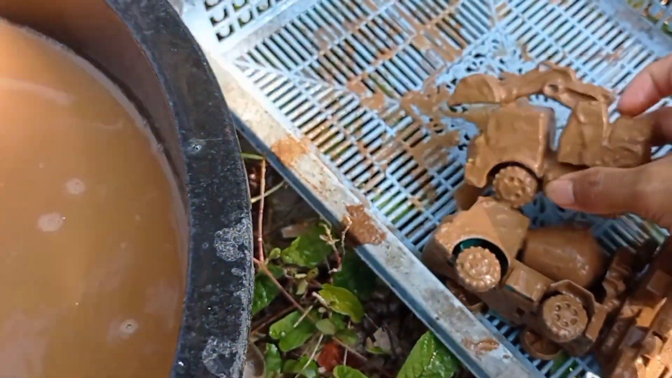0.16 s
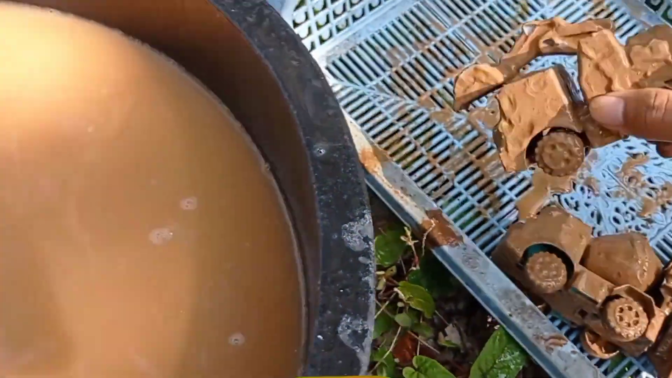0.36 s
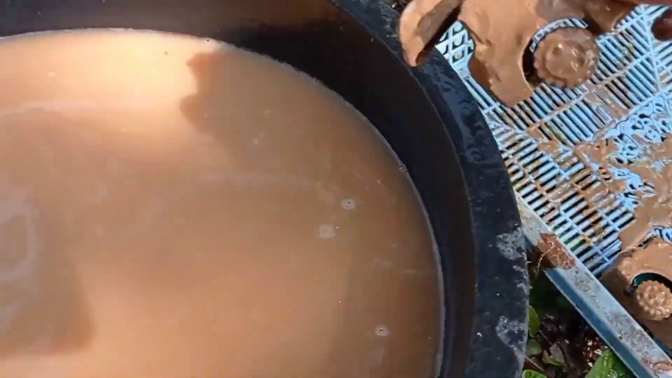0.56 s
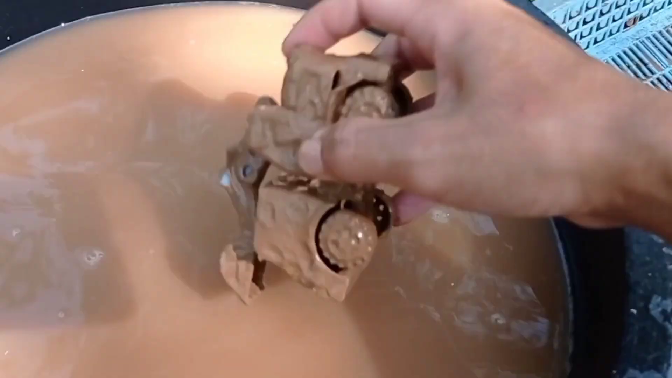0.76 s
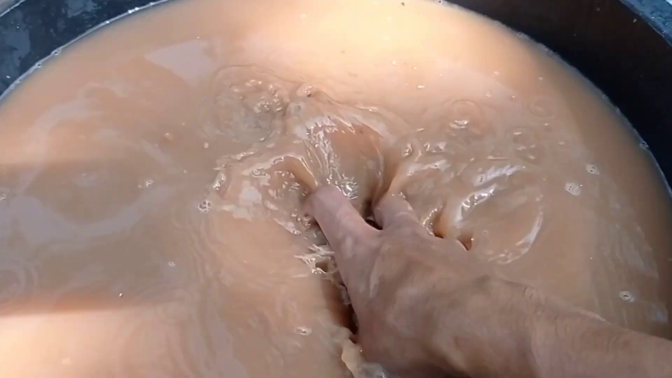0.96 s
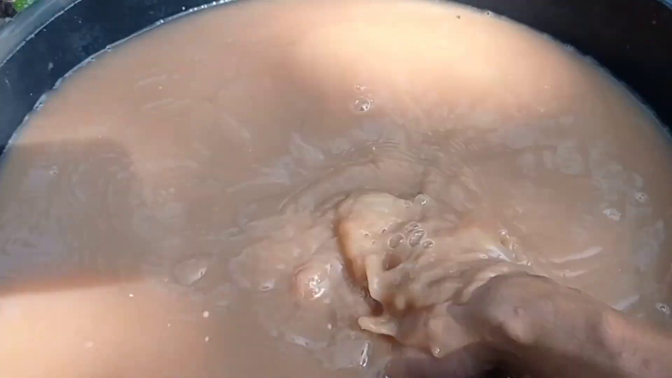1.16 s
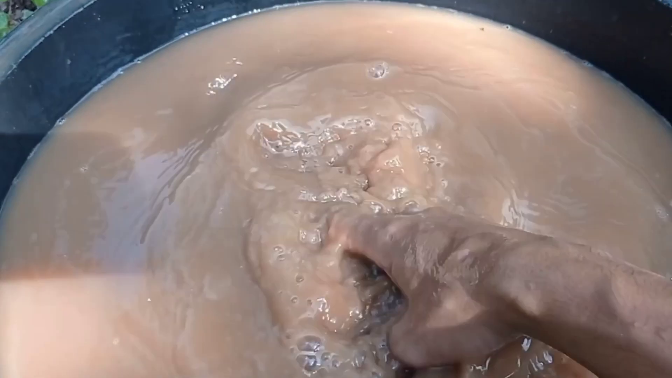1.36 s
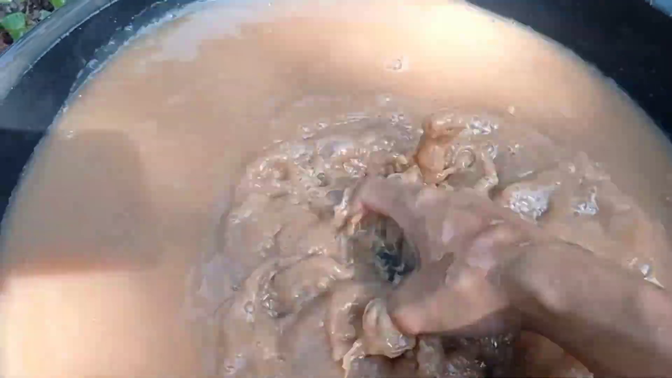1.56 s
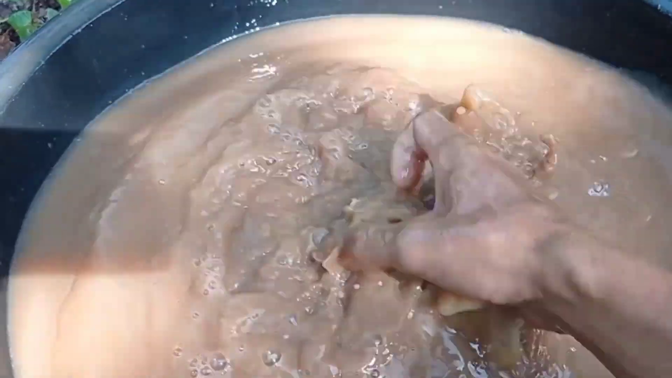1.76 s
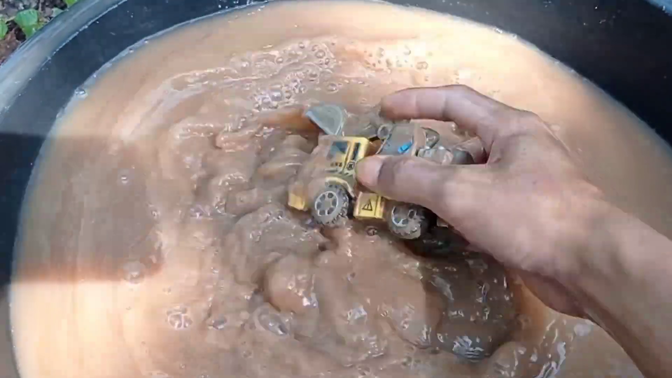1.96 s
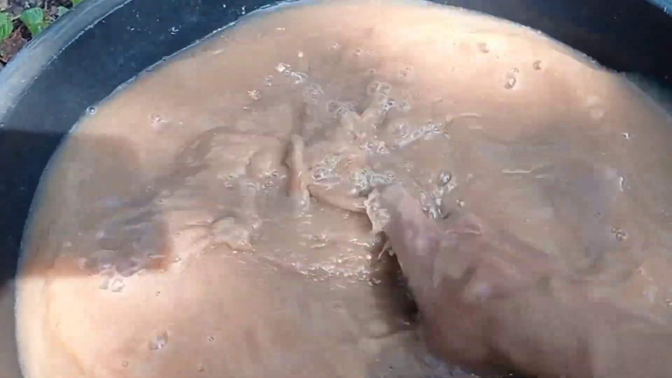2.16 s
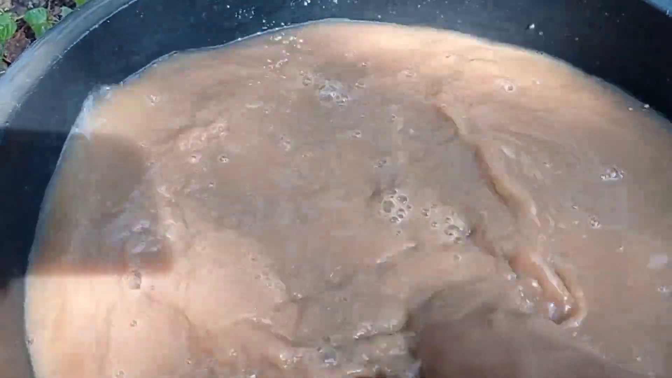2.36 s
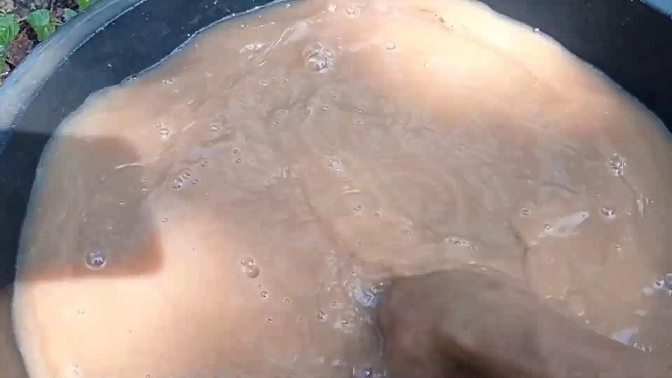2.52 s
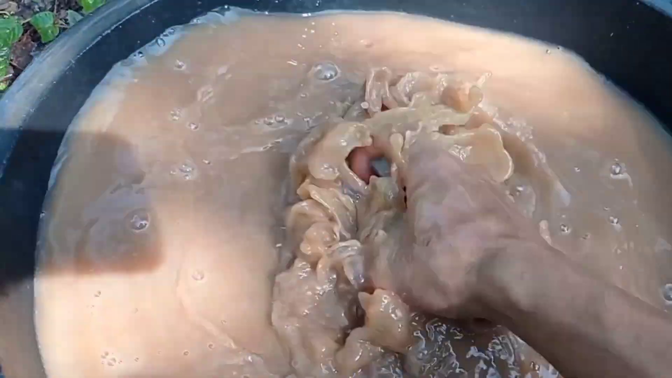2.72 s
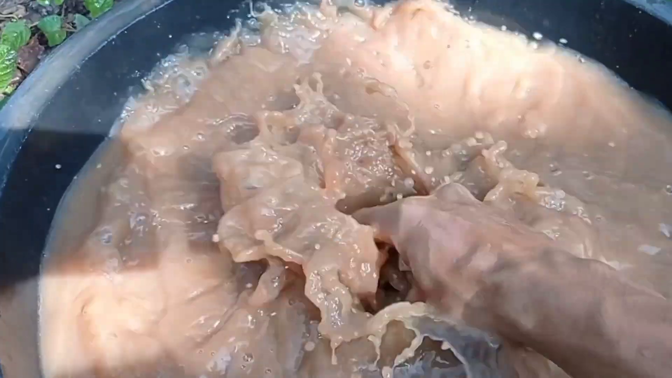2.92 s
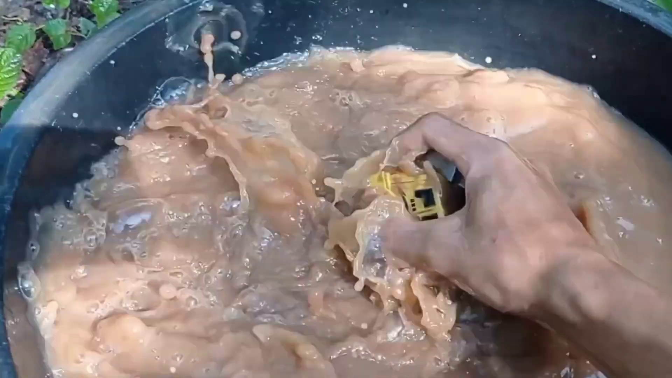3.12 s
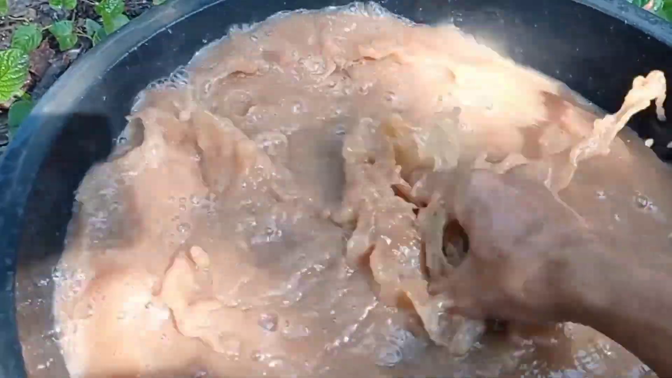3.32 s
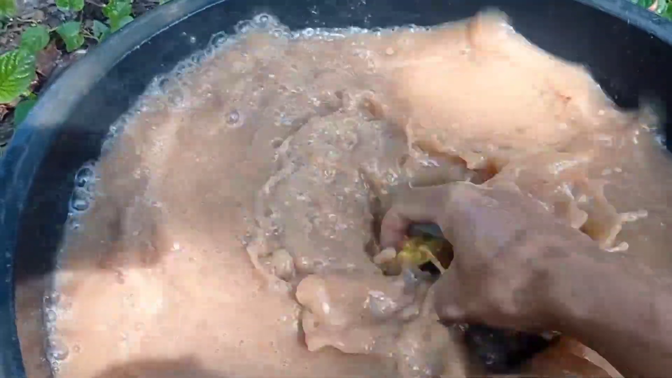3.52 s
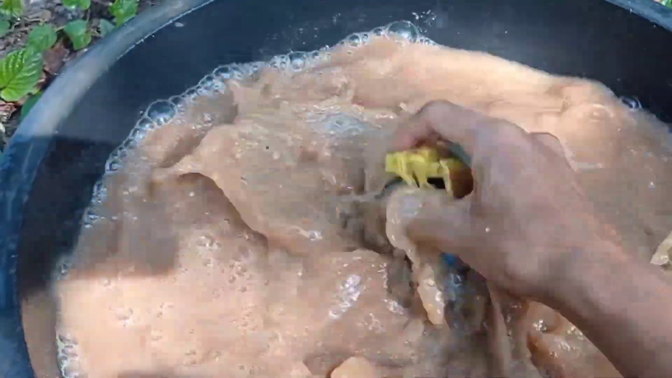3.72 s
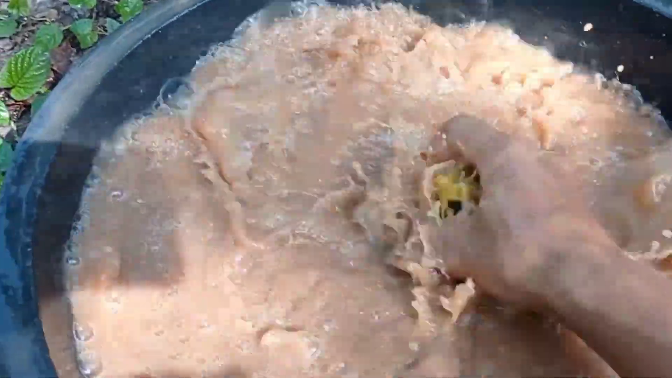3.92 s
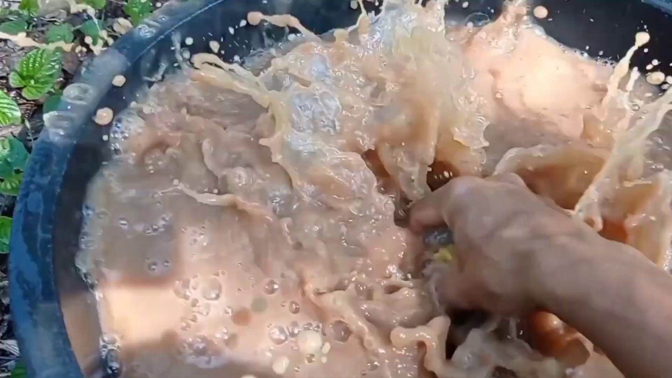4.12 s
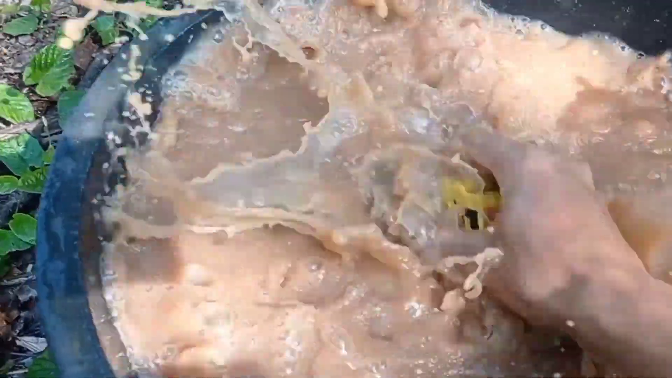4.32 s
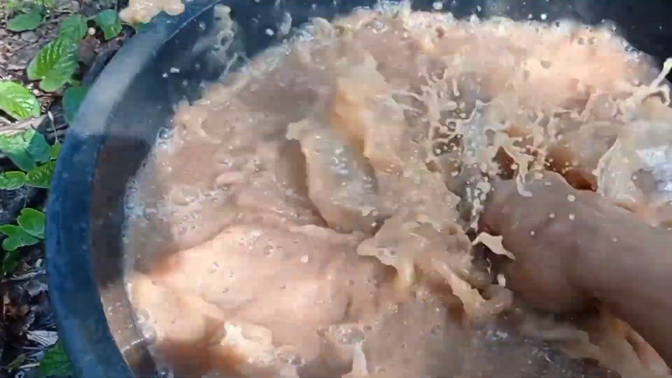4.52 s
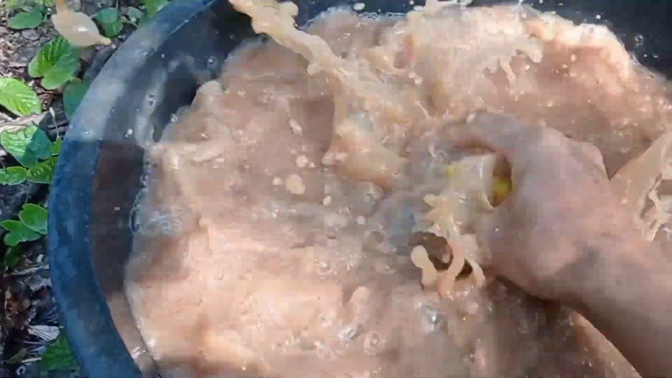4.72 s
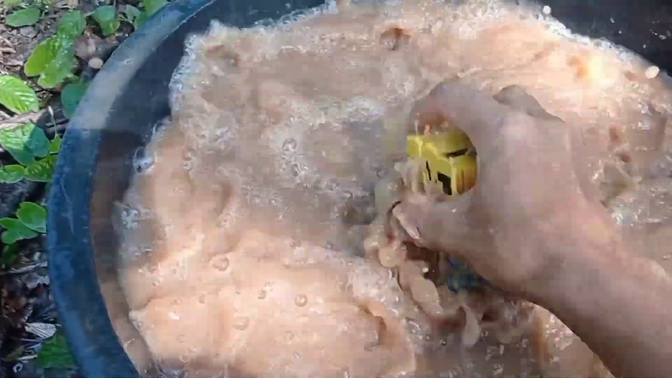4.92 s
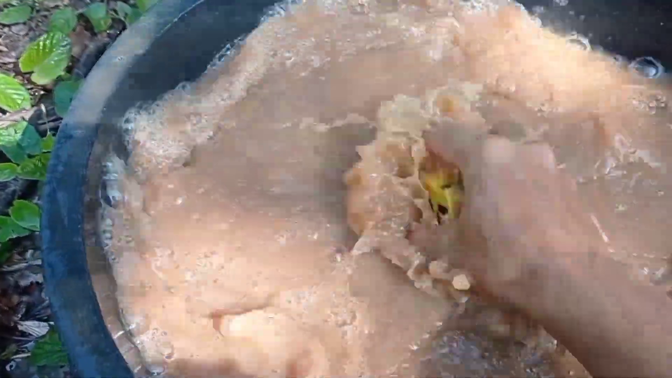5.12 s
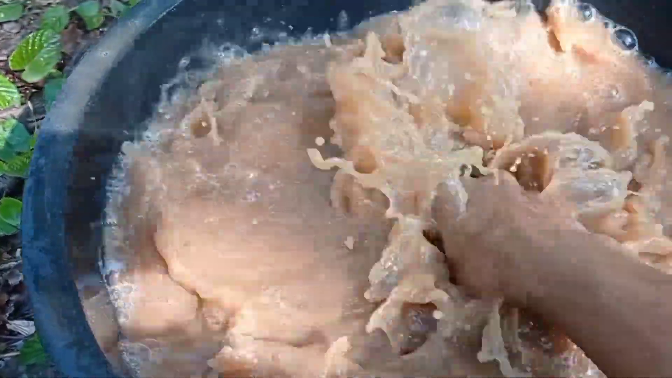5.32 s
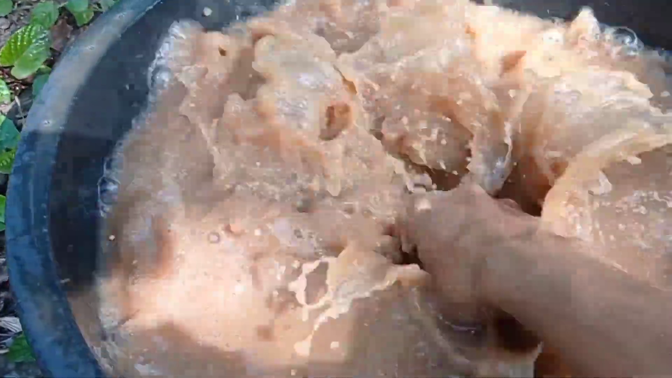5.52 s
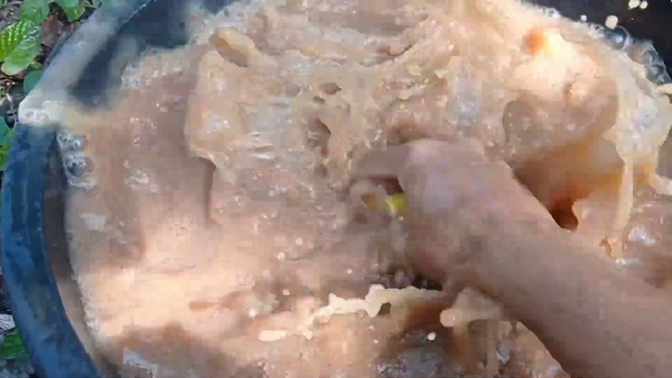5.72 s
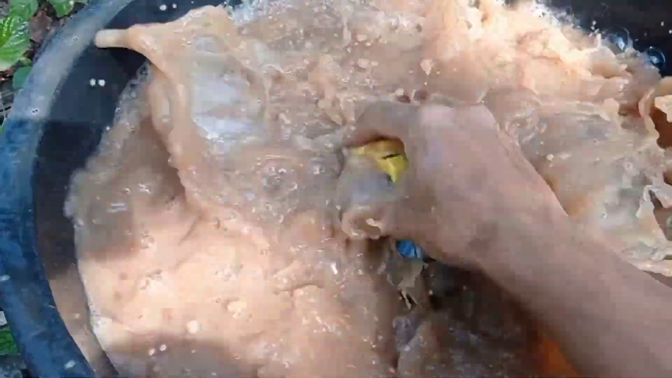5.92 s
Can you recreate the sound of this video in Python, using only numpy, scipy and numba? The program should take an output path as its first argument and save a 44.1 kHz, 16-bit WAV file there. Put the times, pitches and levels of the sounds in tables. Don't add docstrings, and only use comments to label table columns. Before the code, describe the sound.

Close wet splashes, smacks and bubbly trickles in a tub, then vigorous back-and-forth sloshing, over faint engine hum, insects and birds.

```python
import sys
import numpy as np
from scipy import signal
from scipy.fft import rfft, irfft
from scipy.io import wavfile
from scipy.ndimage import uniform_filter1d
from numba import njit

SR = 44100
rng = np.random.default_rng(int(sys.argv[2]) if len(sys.argv) > 2 else 0)


def gain_from_db(level_db):
    decades = np.asarray(level_db, float) / 20
    return 10 ** decades


def wav_out(sig):
    wavfile.write(sys.argv[1], SR, np.round(np.clip(np.atleast_2d(sig).T, -1, 1) * 32767).astype(np.int16))


N = 263493
TIME = np.arange(N) / SR
SPREAD = 0.19
GLIDE = 0.00698


def curve(s, values):
    return np.interp(TIME, s, values)


def walk(rate):
    k = int(SR / rate)
    steps = np.repeat(rng.standard_normal(N // k + 1), k)
    return 1.372 * uniform_filter1d(uniform_filter1d(steps, k), k)[:N]


def band(hz, width_hz):
    f = np.fft.rfftfreq(N, 1 / SR)
    shape = 1 / (1 + (2 * (f - hz) / width_hz) ** 4)
    x = irfft(rfft(rng.standard_normal((2, N))) * shape, N)
    return x / x.std() * [[1], [SPREAD]]


# start_s, level_db
ENGINE = [
    (0, -45),
    (.3, -48),
    (.75, -46),
    (1.6, -48),
    (2.3, -49),
    (3.1, -53),
    (3.5, -58),
    (5.6, -58),
    (5.97, -55),
]
# multiple of firing rate, level_db
EXHAUST = [
    (3, -13),
    (4, -7.5),
    (5, -0.5),
    (6, 0.5),
    (7, -4.5),
    (8, -24),
]
# start_s, firing_hz
FIRING = [
    (0, 33.2),
    (.34, 31.7),
    (.62, 33.2),
    (.95, 33.1),
    (1.45, 32.3),
    (1.7, 32.9),
    (2.25, 33.2),
    (2.48, 32.2),
]


def engine():
    firing_hz = curve(*np.transpose(FIRING)) * (1 + 0.00496 * walk(3.4))
    turn = 2 * np.pi * np.cumsum(firing_hz) / SR
    hum = sum(gain_from_db(db + 2.0 * walk(9)) * np.sin(k * turn) for k, db in EXHAUST)
    return hum / hum.std() * gain_from_db(curve(*np.transpose(ENGINE))) * [[1], [0.07]]


# pitch_hz, width_hz, start_level_db, level_db at 2.3 s, end_level_db
INSECTS = [
    (6104, 153, -52.5, -55.5, -62),
    (7400, 1000, -57.5, -115, -68),
    (3600, 320, -69, -72.5, -58.5),
    (5020, 530, -69, -67, -73),
]


def insects():
    buzz = np.zeros((2, N))
    for hz, width_hz, *db in INSECTS:
        level_db = curve([0, 2.3, N / SR], db) + 2.8 * walk(46)
        buzz += band(hz, width_hz) * gain_from_db(level_db)
    return buzz


# pitch_hz, level_db per Hz
GARDEN = [
    (30, -16),
    (100, -2.5),
    (200, 1),
    (350, -19.5),
    (700, -22.5),
    (2800, -31),
    (5700, -38),
    (8000, -22),
    (10300, -45),
]
GARDEN_DB = -55


def garden():
    hz, db = np.transpose(GARDEN)
    swell = walk(1.5)
    hiss = np.zeros((2, N))
    for f in 30 * 2 ** np.arange(0, 8.6, 0.5):
        colour_db = np.interp(np.log(f), np.log(hz), db)
        hiss += band(f, f / 3) * np.sqrt(f) * gain_from_db(colour_db + 2.0 * swell + 0.85 * walk(8.1))
    duck_db = curve(*np.transpose(ENGINE)) - ENGINE[1][1]
    return hiss / hiss[0].std() * gain_from_db(GARDEN_DB + 0.4 * duck_db)


@njit
def ring(start, hz, rise, size, phase, pan, glide):
    out = np.zeros((2, N))
    for g in range(len(start)):
        step, p = 2 * np.pi * hz[g] / SR, phase[g]
        climb, fade = 1 + glide[g] * hz[g] / SR, np.exp(-3 / rise[g])
        env = size[g] * (np.e / rise[g]) ** 3
        for n in range(min(int(4 * rise[g]), N - start[g]) if size[g] > 0 else 0):
            out[0, start[g] + n] += env * n ** 3 * np.sin(p)
            out[1, start[g] + n] += env * n ** 3 * np.cos(p) * pan[g]
            env, p, step = env * fade, p + step, min(step * climb, 1.6)
    return out


# peak_s, peak_db, pitch_hz
PLOPS = [(0.352, -28.5, 2000), (0.4196, -16.5, 1910), (0.4223, -21.5, 607), (0.4527, -19, 1580),
         (0.4742, -1.2, 1250), (0.559, -16, 2470), (0.589, -14, 523), (0.6201, -13.5, 980),
         (0.7598, -19, 745), (0.7629, -19, 437), (0.7668, -18, 970), (0.7787, -21, 580), (0.7899, -8, 1095),
         (1.063, -20, 1970), (1.37, -26.5, 1710), (1.5939, -19, 1440), (1.688, -18, 2310),
         (1.7683, -18.5, 2690), (1.8267, -17.5, 1058), (1.8313, -22.5, 522), (1.835, -30.5, 2860),
         (2.238, -25.5, 1908), (2.2493, -39, 548), (2.293, -20.5, 1900)]
# peak_s, peak_db, pitch_hz
SNAPS = [(0.479, -23, 4980), (0.5573, -17, 5050), (0.6455, -15, 3700), (0.8714, -27, 3730),
         (1.0559, -22, 3350), (1.1472, -22.5, 3860), (1.2588, -18.5, 4240), (1.5986, -18.5, 4160),
         (1.783, -15, 3900), (2.6084, -16.5, 4100), (2.9914, -16, 3900), (3.05, -17, 3200),
         (3.1249, -10, 3600), (3.5283, -12.5, 4860), (3.6878, -15, 3500), (3.712, -20, 3240),
         (3.7984, -15.5, 3570), (4.0596, -13, 3620), (4.1961, -12, 3860), (4.2246, -10, 3050),
         (4.411, -16.5, 5260), (4.557, -20.5, 3140), (4.624, -19.5, 3150), (4.733, -16, 3250),
         (4.8907, -17.5, 3960), (5.404, -14.5, 3750), (5.591, -13, 4200), (5.6792, -18, 3880),
         (5.8346, -23, 5500), (5.9187, -25.5, 4040)]
# peak_s, peak_db, pitch_hz
TRICKLE = [(0.505, -19, 1186), (0.539, -28, 925), (0.568, -28, 535), (0.658, -28, 686), (0.706, -37, 2340),
           (0.814, -25.5, 1500), (0.929, -38, 1410), (1.096, -23.5, 2240), (1.177, -21, 1630),
           (1.198, -20, 2300), (1.236, -22, 2640), (1.282, -21.5, 2820), (1.319, -25, 1540),
           (1.445, -34, 2020), (1.506, -31, 1380), (1.654, -32, 1555), (1.699, -28.5, 1110),
           (1.746, -22, 2140), (1.958, -38, 800), (1.986, -35, 705), (2.26, -30, 2450)]
# peak_s, peak_db, pitch_hz
GURGLES = [(2.3284, -14, 2380), (2.3783, -11, 1660), (2.38, -13, 1137), (2.3922, -14, 1030),
           (2.4615, -12.5, 2270), (2.527, -14.5, 2300), (2.59, -14, 1510), (2.753, -7, 2080),
           (2.82, -5.5, 1784), (2.8197, -14, 757), (2.852, -15, 2440), (2.9749, -14, 606),
           (3.2743, -9.5, 1560), (3.4292, -11.5, 2120), (3.4366, -14, 596), (3.4383, -9, 2020),
           (3.4634, -8.5, 983), (3.543, -18, 2623), (4.28, -10.5, 1860), (4.3955, -23.5, 462),
           (4.663, -23, 2400), (4.795, -14, 1350), (5.1319, -19, 846), (5.143, -13, 1765),
           (5.2202, -12, 2760), (5.234, -12, 2160), (5.2923, -12, 975), (5.4001, -8, 2000),
           (5.471, -18, 1940)]
# peak_s, peak_db, pitch_hz
GLUGS = [
    (.592, -16, 288),
    (0.621, -20, 420),
    (0.893, -25, 318),
    (5.3, -13.5, 885),
    (5.786, -40, 131),
    (5.879, -32.5, 130),
    (5.919, -33, 120),
    (3.997, -30, 202),
    (4.219, -31, 229),
    (4.394, -28, 231),
]
# peak_s, peak_db
DROPS = [(.4205, -31), (0.5572, -16.5), (0.647, -27), (0.696, -40), (1.0244, -32), (1.06, -30.5),
         (1.0718, -26), (1.7833, -25), (1.836, -28), (1.8884, -31), (2.0073, -37.5), (2.841, -26.5),
         (2.99, -20.5), (3.8612, -27), (4.833, -22), (5.3394, -24), (5.5343, -20), (5.8896, -26),
         (5.947, -35)]
DROP_HZ, FLING_DB = 8200, -6
BUBBLE_MS, SIZE_LAW = 3.584, -0.7


def pops(count=4):
    fine = [(s, db, DROP_HZ) for s, db in DROPS]
    flung = [(s, db + FLING_DB, DROP_HZ) for s, db, *_ in PUSHES]
    leaders = np.array(PLOPS + GURGLES + SNAPS + TRICKLE + GLUGS + fine + flung)
    s, db, hz = np.repeat(leaders, count, axis=0).T
    phase, side, late, shift = rng.random((len(s), 4)).T
    trailing = np.arange(len(s)) % count > 0
    rise = np.maximum(BUBBLE_MS * (hz / 1000) ** SIZE_LAW, 1.2) / 1000 * SR / 1.395
    start = s * SR - rise + trailing * late * (3.0 * rise + 90)
    pitch = np.minimum(0.9615 * hz * 2 ** (trailing * 1.096 * (shift - 0.5)), 10000)
    size = gain_from_db(db - 14.1 * trailing)
    pan = SPREAD * np.sign(side - 0.5)
    return ring(start.astype(np.int64), pitch, rise, size, 2 * np.pi * phase, pan, GLIDE + 0 * s)


def slaps(count):
    when, chance = rng.random((count, 2)).T
    kicks = np.zeros(N)
    kicks[(when * N).astype(int)] = -np.log(1 - 0.95 * chance)
    drained = signal.lfilter([1], [1, -np.exp(-1 / (0.008 * SR))], kicks)
    bursts = uniform_filter1d(drained, size=220)
    return bursts / bursts.mean()


def swarm(kind, power, count):
    low_hz, high_hz, cycles, scatter_db, tilt_db, trim_db = kind
    when, pitch, chance, long, phase, side, born, climb = rng.random((count, 8)).T
    start = (when * N).astype(np.int64)
    octaves = pitch * np.log2(high_hz / low_hz)
    hz = low_hz * 2 ** octaves
    rise = cycles * SR / hz * 2 ** (2.78 * (long - 0.5))
    size = gain_from_db(tilt_db * octaves - scatter_db * np.log(1 - 0.999 * chance)) / np.sqrt(rise)
    size = size / np.sqrt(np.sum(size ** 2 * rise) * 0.47 / N)
    share = np.clip((power[start] / np.percentile(power, 85)) ** 0.3, 0.7, 1)
    size = size * gain_from_db(trim_db) * np.sqrt(power[start] / share) * (born < share)
    pan = SPREAD * np.sqrt(12) * (side - 0.5)
    return ring(start, hz, rise, size, 2 * np.pi * phase, pan, GLIDE / cycles * (7 * climb - 2.5))


# low_hz, high_hz, rise in cycles, scatter_db, tilt_db per octave, trim_db
GULPS = (225, 786, 2.41, 1.96, 11, 0.65)
BUBBLES = (819.5, 3196, 7.5, 1.96, 2, -4)
SPRAY = (3179, 5795, 10, 2.5, -6.5, -2.5)
MIST = (5802.5, 10294, 10.5, 2, -4.5, -6.5)
# start_s, unrest_db
UNREST = [(0.0, -62.5), (0.38, -62.5), (0.61, -43), (0.72, -51), (1.15, -43), (1.61, -48), (1.93, -58),
          (2.17, -72), (2.48, -36.5), (2.96, -31.5), (3.36, -31), (4.11, -31.5), (4.48, -42), (5.02, -30.5),
          (5.55, -32), (5.8, -44.5), (5.97, -66)]
# peak_s, level_db, length_ms, gulp_db and spray_db over bubbles
SPLASHES = [(0.357, -41.5, 20, -8, -11), (0.427, -33, 22, -14, -0.5), (0.472, -27.5, 22.7, -5, -5),
            (0.507, -37, 17, -34, -29), (0.56, -32, 125, -27, -6.5), (0.767, -47.5, 34, 14.5, -31),
            (0.865, -39, 57, -2.5, -11), (0.966, -50, 39, 2.5, -3), (1.062, -31.5, 79, -9.5, -6),
            (1.15, -31.5, 11, -25, -5.5), (1.179, -33.5, 210, -32, -23), (1.243, -28.5, 79, -15, -5.5),
            (1.373, -49, 77, 2.5, -20), (1.449, -36, 22, -22, -5), (1.538, -41.5, 77, -32, -3),
            (1.592, -30, 17, -36, -1), (1.698, -36, 77, -24, -7), (1.776, -29, 24, -20, -1),
            (1.832, -34, 16, -1, -1), (2.04, -47, 70, 2, -12), (2.249, -45, 40, -32.5, 1),
            (2.3, -37.5, 52, -18, 0), (5.852, -43.5, 31, -5.5, 1), (5.929, -40.5, 56, -16, -1)]
# peak_s, level_db, length_ms, spray_db over bubbles
PUSHES = [(2.336, -24, 36, -8), (2.466, -20.5, 38, -3.5), (2.596, -28.5, 80, -2.5), (2.754, -28, 55, -4.5),
          (2.919, -31, 61, -12.5), (3.06, -24, 48, -5.5), (3.223, -23, 40, -6.5), (3.383, -22.5, 60, -3),
          (3.529, -19.5, 58, -1.5), (3.666, -22, 41, -3), (3.801, -22.5, 45, -2), (3.942, -24, 55, -5),
          (4.083, -23, 45, -1), (4.216, -18.5, 40, -3), (4.345, -27.5, 66, -4), (4.549, -25.5, 55, -4),
          (4.737, -25, 70, -6.5), (4.893, -20.5, 28, -7.5), (5.062, -18.5, 32, -4), (5.229, -20, 30, -1.5),
          (5.399, -18.5, 32, -5), (5.587, -20.5, 33, -6.5)]
# peak_s, level_db, length_ms, gulp_db over bubbles
PULLS = [(2.395, -21.5, 51, -14), (2.532, -24.5, 56, -11.5), (2.691, -28.5, 30, -12),
         (2.823, -20, 18, -8.5), (2.974, -25, 47, -4.5), (3.133, -21, 38.4, -7), (3.277, -21, 51, -10),
         (3.442, -20.5, 46, -12.5), (3.601, -25.5, 46, -7), (3.73, -25.5, 44, -5), (3.874, -22.5, 42, -4.5),
         (4.005, -25.5, 43, -6), (4.143, -26.5, 64, -8), (4.275, -27, 43, -4.5), (4.403, -32.5, 13, -4.5),
         (4.608, -24.5, 38, -13), (4.818, -25, 41.5, -14.5), (4.966, -22, 26, -19), (5.144, -25, 45, -21),
         (5.296, -20.5, 23, -5.5), (5.47, -24.5, 40, -17), (5.7, -28.5, 127, -15.5)]
PUSH_GULP_DB, PULL_SPRAY_DB = -13.5, -9
CALM_DB = -45
GULP_DB, GULP_SLOPE, SPRAY_DB, SPRAY_SLOPE = -61, 1.45, -48, 0.88
STEADY = 0.4


def churning():
    unrest = curve(*np.transpose(UNREST))
    over = unrest - CALM_DB
    slosh_db = np.array([GULP_DB + GULP_SLOPE * over, unrest, SPRAY_DB + SPRAY_SLOPE * over])
    power = gain_from_db(2 * slosh_db)
    pushes = [(*row, PUSH_GULP_DB, spray_db) for *row, spray_db in PUSHES]
    pulls = [(*row, PULL_SPRAY_DB) for row in PULLS]
    for peak, db, ms, gulp_db, spray_db in SPLASHES + pushes + pulls:
        near = slice(max(int((peak - 0.2) * SR), 0), int((peak + 0.2) * SR))
        late = (TIME[near] - peak) / (ms / 1000)
        hump = np.exp(-(late / np.where(late < 0, 0.4, 0.42)) ** 2)
        power[:, near] += hump * gain_from_db(2 * (db + np.array([[gulp_db], [0], [spray_db]])))
    shared = slaps(count=300)

    def slapped(flow):
        return flow * (STEADY + (1 - STEADY) * (shared + slaps(count=300)) / 2)

    gulp_power, bubble_power, spray_power = power
    water = swarm(GULPS, slapped(gulp_power), count=1800)
    water += swarm(BUBBLES, slapped(bubble_power), count=9000)
    water += swarm(SPRAY, slapped(spray_power), count=10000)
    water += swarm(MIST, slapped(spray_power), count=14000)
    return water


TUB_S, TUB_DB = 0.006, -15


def tub(water):
    t = TIME[:SR // 15]
    lines = rfft(rng.standard_normal(len(t)) * np.exp(-t / TUB_S) * (t > 0.001))
    tail = irfft(lines / uniform_filter1d(np.abs(lines), size=11), len(t))
    tail = tail / np.linalg.norm(tail) * gain_from_db(TUB_DB)
    return water + signal.fftconvolve(water, tail[None])[:, :N]


# start_s, peak_db
SMACKS = [(0.4157, -20), (0.4504, -18), (0.468, -23), (0.5541, -9.5), (0.5866, -16), (0.6448, -12),
          (1.1457, -21.5), (1.6995, -27), (1.7427, -24.5), (1.7669, -16.5), (1.8865, -29), (2.3953, -16.5),
          (2.4615, -18.5), (2.5117, -19), (3.0414, -16), (3.0994, -15.5), (3.1446, -15), (3.5893, -20),
          (3.6593, -13.5), (3.7113, -14), (3.894, -21), (4.5348, -16), (4.7661, -23), (4.878, -16.5),
          (5.282, -26), (5.3856, -13), (5.5687, -11.5)]
# start_s, peak_db
BUMPS = [
    (0.734, -48),
    (3.114, -54),
    (5.211, -50),
]
SMACK_MS, SMACK_DB, SMACK_HZ = 3.3, -5, 1500
BUMP_HZ, BUMP_MS, BUMP_DB = 58, 18, 6


def knocks():
    env = np.zeros(N)
    s, db = np.transpose(SMACKS)
    env[(s * SR).astype(int)] = gain_from_db(db + SMACK_DB)
    env = signal.lfilter([1], [1, -np.exp(-1000 / (SMACK_MS * SR))], env)
    env = uniform_filter1d(env, size=60)
    bright = signal.butter(1, SMACK_HZ, "high", fs=SR, output="sos")
    hiss = signal.sosfilt(bright, rng.standard_normal((2, N)))
    s, db = np.transpose(BUMPS)
    even = np.ones(len(s))
    rise = BUMP_MS / 1000 * SR * even
    start = (s * SR).astype(np.int64)
    deep = ring(start, BUMP_HZ * even, rise, gain_from_db(db + BUMP_DB), 0 * s, SPREAD * even, 0 * s)
    return env * hiss * [[1], [SPREAD]] + deep


# peak_s, peak_db, pitch_hz, length_ms
DRIPS = [(0.558, -25, 4070, 9), (0.591, -30, 1210, 9), (0.616, -29.5, 2760, 16), (0.647, -34, 5250, 7),
         (0.649, -30, 727, 13), (0.859, -37, 950, 9), (0.863, -35, 1530, 11), (0.873, -36, 3990, 12),
         (0.879, -39, 2280, 8), (1.056, -29.5, 3370, 14), (1.064, -24, 1983, 8), (1.099, -31, 2740, 7),
         (1.15, -28, 1040, 11), (1.15, -26.5, 1640, 8), (1.17, -31, 1460, 11), (1.178, -28, 2410, 9),
         (1.183, -25, 1640, 10), (1.191, -27, 2630, 9), (0.805, -29, 1520, 12), (1.228, -28, 1720, 14),
         (1.236, -29, 3360, 8), (1.237, -28, 3960, 9), (1.24, -23.5, 2100, 9), (0.775, -25, 930, 18),
         (1.248, -29.5, 1026, 14), (1.249, -26, 640, 9), (0.76, -25, 1220, 12), (1.263, -26, 1580, 12),
         (1.283, -26, 2700, 7), (1.697, -29.5, 1460, 8), (1.748, -29, 3960, 9), (1.768, -32, 4640, 8),
         (1.777, -29, 1680, 10), (1.78, -31, 4780, 10), (0.892, -13, 545, 10), (2.058, -25, 690, 9),
         (2.032, -33, 1000, 11), (2.062, -31, 960, 9), (2.294, -24, 1770, 11)]
# peak_s, peak_db, pitch_hz, length_ms
BLOBS = [(2.38, -17, 2057, 9), (2.4, -23, 3130, 8), (2.402, -21.5, 2000, 8), (2.464, -17, 1550, 9),
         (2.528, -22.5, 946, 8.2), (2.528, -20, 1890, 7.2), (2.529, -24, 1427, 15), (2.822, -24, 2930, 8),
         (2.854, -21, 2500, 8), (2.933, -24, 556, 8), (2.95, -22, 779, 11.6), (2.973, -27, 2100, 9),
         (2.988, -25, 2020, 9), (3.124, -21, 2765, 8.2), (3.125, -23, 824, 11.3), (3.125, -22, 1680, 13),
         (3.148, -20, 2170, 8), (3.149, -21, 597, 8), (3.231, -22.5, 2670, 7), (3.274, -24, 730, 9),
         (3.38, -17, 1585, 12.7), (3.393, -24, 1636, 20), (3.395, -23.5, 557, 14), (3.44, -18, 1070, 10.5),
         (3.507, -22, 1460, 13), (3.592, -23.5, 1030, 11.6), (3.662, -22, 1710, 17),
         (3.723, -19.5, 730, 11.4), (3.739, -22.5, 780, 11.3), (3.872, -19.5, 1630, 9.8),
         (3.935, -20, 860, 13.5), (3.966, -21.5, 2200, 11.4), (3.999, -23.5, 1456, 13),
         (4.06, -22, 3310, 8), (4.09, -21.5, 1680, 12.4), (4.091, -25.5, 3620, 16.3),
         (4.133, -22.5, 2540, 7.8), (4.15, -21, 1720, 8.3), (4.197, -22, 3790, 8), (4.2, -18.5, 780, 8),
         (4.219, -23, 2245, 13), (4.22, -24, 1634, 21), (4.222, -19.5, 2800, 15), (4.358, -21, 1670, 8.2),
         (4.546, -28, 3250, 25), (4.549, -25, 1340, 8.9), (4.611, -24.5, 1462, 24), (4.625, -30, 1555, 22),
         (4.731, -24.5, 1340, 7.4), (4.81, -23.5, 1850, 9), (4.822, -24, 1940, 9), (4.823, -26, 1240, 11.3),
         (4.891, -25, 3790, 8), (4.895, -22, 1800, 8), (4.899, -23, 3230, 7.4), (4.962, -19.5, 1590, 8.7),
         (5.062, -20, 2145, 9), (5.131, -19.5, 788, 9), (5.232, -21.5, 1717, 16.3), (5.237, -21, 2570, 11),
         (5.238, -23, 4480, 15), (5.242, -20.5, 3660, 10.6), (5.292, -21.5, 1686, 10),
         (5.325, -22.5, 1977, 8.3), (5.399, -19, 1583, 9.8), (5.412, -24, 688, 11.8), (5.471, -21, 1980, 7),
         (5.577, -22.5, 1896, 8.5), (5.591, -24.5, 4570, 8), (5.593, -23.5, 2400, 18),
         (5.596, -22.5, 1590, 8.7), (5.654, -24, 1240, 11)]
HELD_DB, HELD_SHORT_MS, HELD_GLIDE = 0.5, 3.495, 0.03


def held():
    s, db, hz, ms = np.array(DRIPS + BLOBS, float).T
    phase, side, climb = rng.random((len(s), 3)).T
    rise = np.maximum(ms - HELD_SHORT_MS, 2.5) / 1000 * SR / 1.4
    glide = HELD_GLIDE * 2 * climb * SR / (hz * rise)
    pitch = hz * (1 - glide * hz * rise / SR)
    start = (s * SR - rise).astype(np.int64)
    pan = SPREAD * np.sign(side - 0.5)
    return ring(start, pitch, rise, gain_from_db(db + HELD_DB), 2 * np.pi * phase, pan, glide)


# start_s, end_s, from_hz, to_hz, level_db, blur 0-1
BIRDS = [
    (0.806, 0.876, 9600, 6500, -40, 0.05),
    (1.846, 1.892, 3840, 4720, -50, 0.4),
    (1.886, 2.0, 4640, 4780, -60.5, 0),
    (1.983, 2.081, 8050, 5870, -50.5, 0.8),
    (2.077, 2.149, 4040, 2940, -57, 0.4),
    (2.169, 2.228, 3600, 4410, -48.5, 0.1),
]


def birds():
    song = np.zeros(N)
    for t0, t1, hz0, hz1, db, blur in BIRDS:
        part = np.clip((TIME - t0) / (t1 - t0), 0, 1)
        hz = (hz0 + (hz1 - hz0) * part) * (1 + 0.078 * blur * walk(260))
        swell = np.sqrt(np.sin(np.pi * part).clip(0)) * (part < 1)
        song += gain_from_db(db) * swell * np.sin(2 * np.pi * np.cumsum(hz) / SR)
    t = TIME[:SR // 3]
    echoes = rng.standard_normal((2, len(t))) * np.exp(-t / 0.054) * gain_from_db(-28.5)
    return song * [[1], [0]] + signal.fftconvolve(song[None], echoes * [[1], [SPREAD]])[:, :N]


def scene():
    water = tub(churning() + pops() + held() + knocks())
    mid, side = water + engine() + birds() + insects() + garden()
    return np.array([mid + side, mid - side])


PATCH_DB, PATCH_SHARE = 2, 0.6


def patchy(dry):
    mid, side = (dry[0] + dry[1]) / 2, (dry[0] - dry[1]) / 2
    f, t, z = signal.stft(side, SR, nperseg=1536)
    row = (6 * np.log2(1 + f / 900)).astype(int)
    column = np.arange(len(t)) // 2
    keep, size = rng.random((2, row[-1] + 1, len(t)))[:, row][:, :, column]
    share = PATCH_SHARE * np.clip(f / 700, 0.6, 1)[:, None]
    gain = (keep < share) * gain_from_db(PATCH_DB + 8 * (size - 0.5))
    smear = np.exp(2j * np.pi * rng.random(z.shape))
    side = signal.istft(z * gain * smear, SR, nperseg=1536)[1][:N]
    return np.array([mid + side, mid - side])


def band_limit(x):
    return signal.sosfilt(signal.butter(12, 10930, fs=SR, output="sos"), x)


def record(dry):
    thin = signal.sosfilt(signal.butter(1, 80, "high", fs=SR, output="sos"), patchy(dry))
    dull = signal.sosfilt(signal.cheby1(8, 0.5, 9550, fs=SR, output="sos"), thin)
    mix = signal.sosfilt(signal.ellip(8, 0.5, 70, 10330, fs=SR, output="sos"), dull)
    return band_limit(mix)


dry = scene()
out = record(dry)
wav_out(out)
```